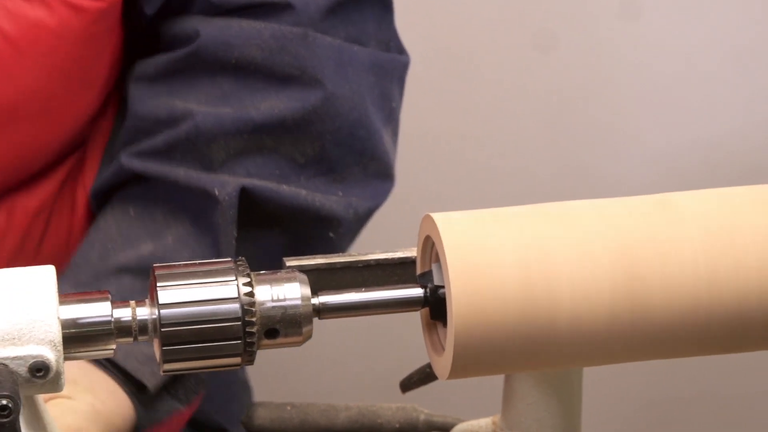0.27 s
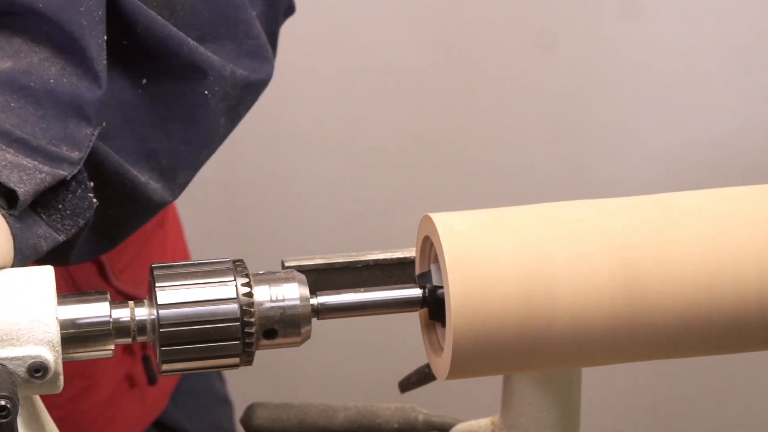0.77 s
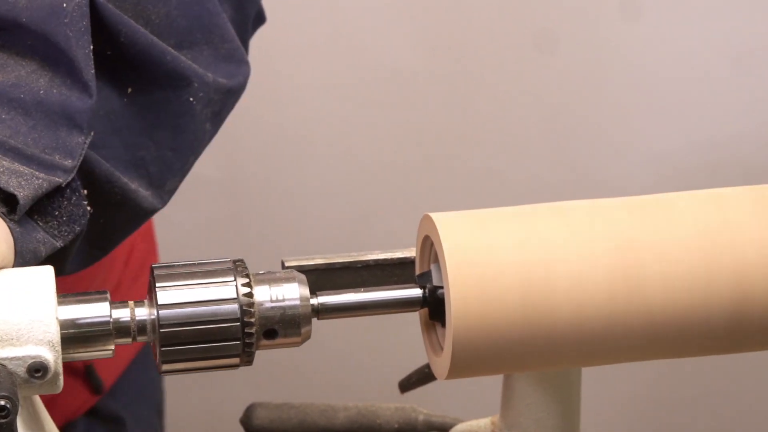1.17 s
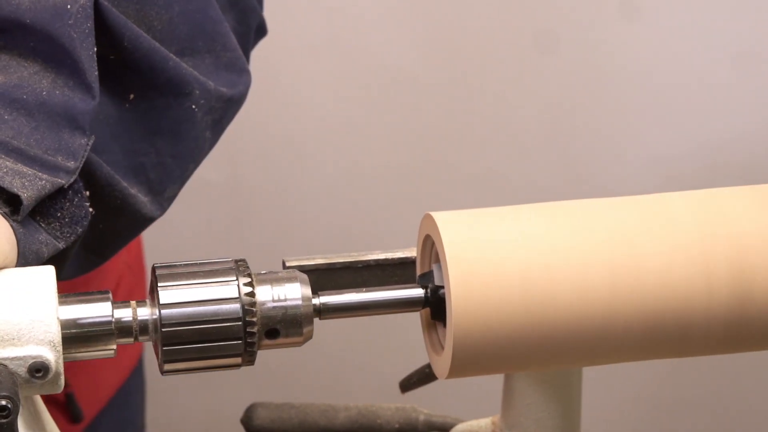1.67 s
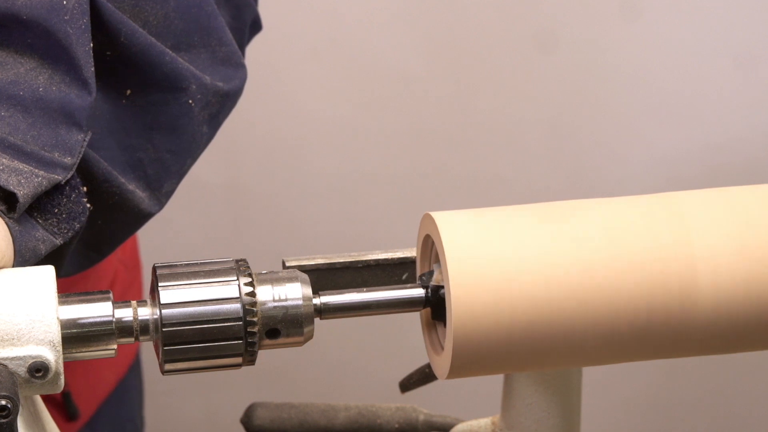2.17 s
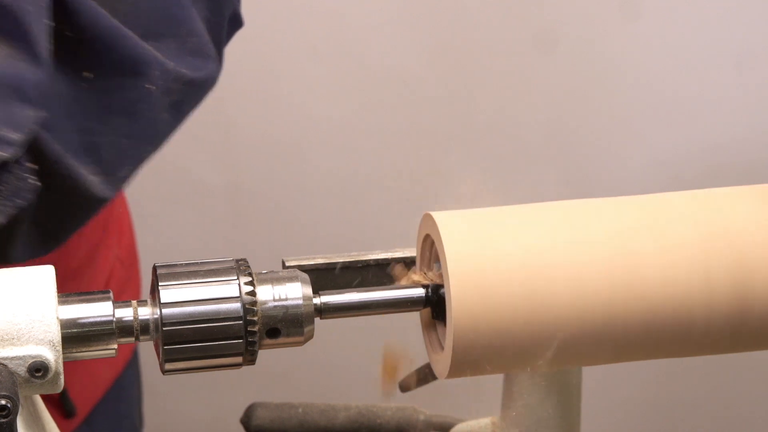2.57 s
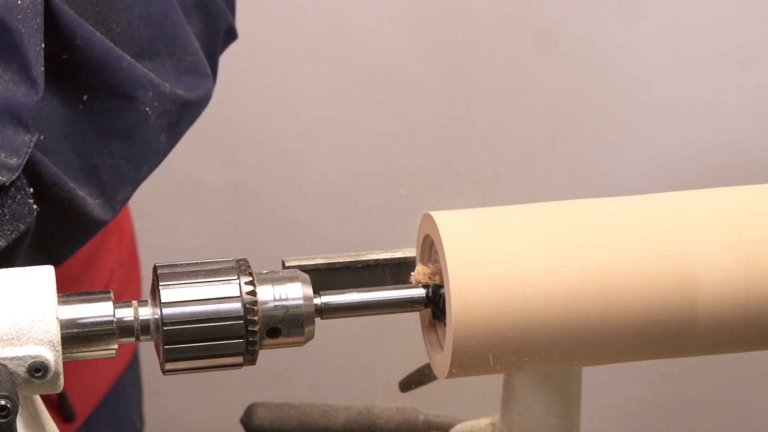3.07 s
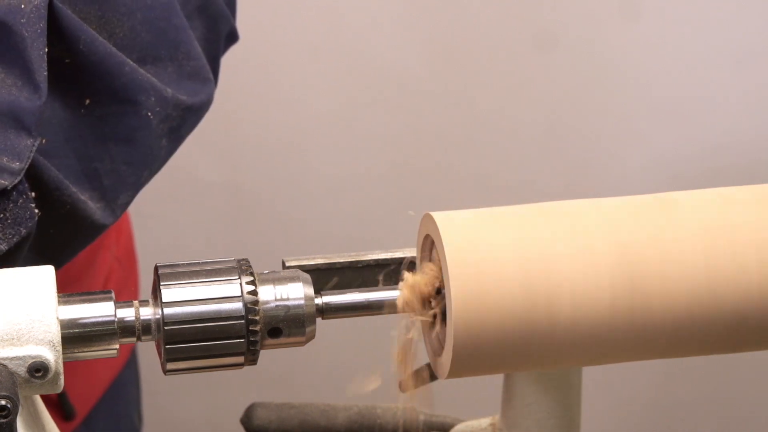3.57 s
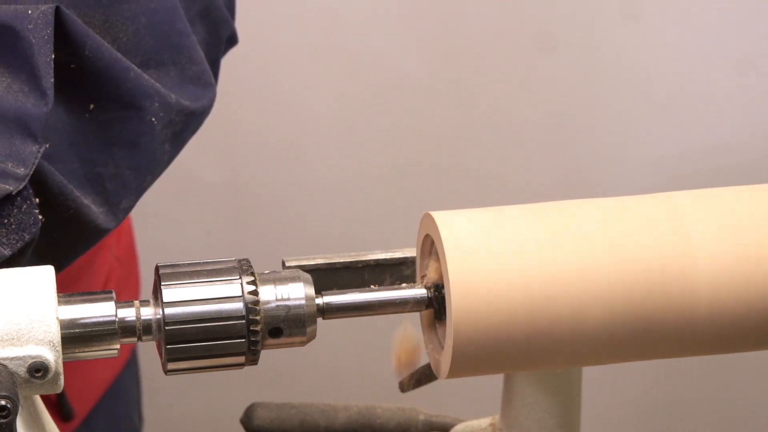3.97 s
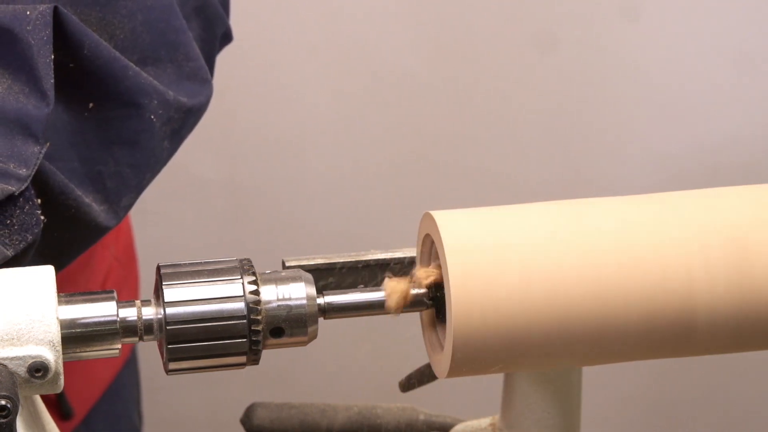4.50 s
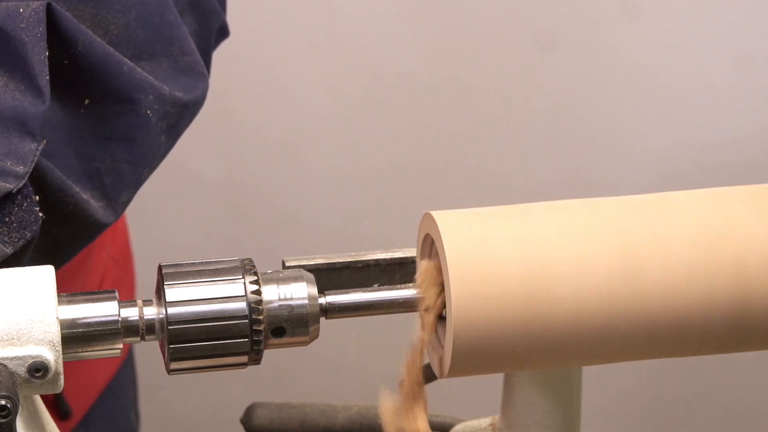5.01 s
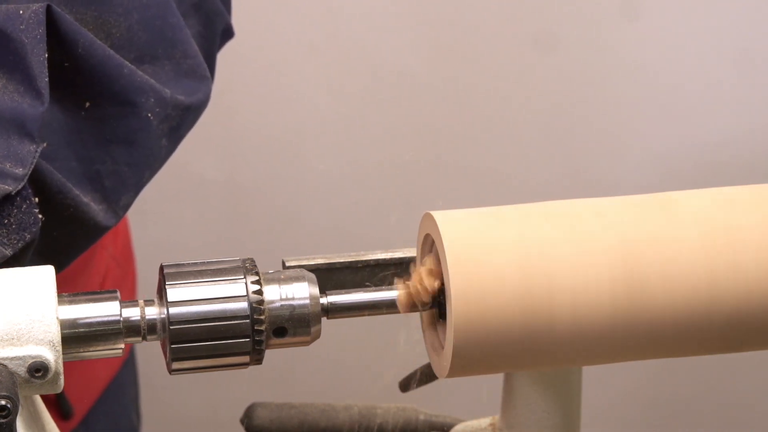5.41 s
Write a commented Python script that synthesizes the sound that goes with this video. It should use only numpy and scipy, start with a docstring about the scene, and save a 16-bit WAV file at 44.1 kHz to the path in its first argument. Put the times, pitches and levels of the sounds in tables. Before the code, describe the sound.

In a small workshop, a wood lathe idles with quiet hiss and hum. A nylon sleeve swishes close by and a hand knocks the tailstock. Ragged scuffs follow, then a steel bit bites into the spinning hollow blank: a noisy high whine and wooden growl, throbbing with each turn. Shavings pack the bore and muffle the steel before bursting free. Close microphone, short room echo.

```python
"""A wood lathe idles in a workshop; a nylon sleeve brushes past and a hand lands on the tailstock.
A boring bit then scuffs the spinning blank, and bites: its steel shank whines while the hollow blank growls.
The edge meets nearly the same grain on every turn, so the cut throbs and chatters in step with the spindle.
Shavings pack the bore, muffling the steel and swelling the growl. A low throb joins in, and air puffs past.
At last the shavings burst free. Most sounds are noise or clicks sent through the ringing of wood and metal."""
import sys
import numpy as np
from scipy import signal
from scipy.fft import rfft, irfft
from scipy.io import wavfile
from scipy.ndimage import map_coordinates

SR = 44100
rng = np.random.default_rng(int(sys.argv[2]) if len(sys.argv) > 2 else 0)


def master_out(mix):
    """Clip the mix to full scale and print it as 16-bit PCM to the path in sys.argv[1]."""
    frames = np.transpose(np.atleast_2d(mix))
    ceiling = np.clip(frames, -1, 1)
    pcm = np.round(ceiling * 32767).astype(np.int16)
    wavfile.write(sys.argv[1], SR, pcm)


N = 249165
TIME = np.arange(N) / SR
BINS = np.fft.rfftfreq(8192, 1 / SR)  # Hz
# the bit bites, and the shock of entry settles (s)
BITE_S, SETTLE_S = 2.226, 0.33
# shavings pack the bore, then burst free: moments, and the time each change takes (s)
PACK_S, PACKING_S, CLEAR_S, CLEARING_S = 3.85, 0.16, 5.49, 0.077


def amp(db):
    """Turns decibels into gain."""
    return 10 ** (np.asarray(db) / 20)


def unit(x):
    """Scales to an average (rms) level of 1."""
    return x / np.sqrt(np.mean(x ** 2) + 1e-20)


def slope(points):
    """Gain of a broad sound colour at each frequency."""
    hz, db = np.transpose(points)
    return amp(np.interp(np.log(BINS + 1), np.log(hz), db))


def peaks(modes, steep):
    """Gain of a set of resonances at each frequency; a larger steep darkens the valleys between them."""
    f = BINS + 1
    power = 0
    for hz, width, db in modes:
        detuning = (f * f - hz * hz) / (f * width)
        power = power + amp(db) ** 2 / (1 + detuning ** 2) ** steep
    return np.sqrt(power)


def ring(x, gain):
    """Sends x through a body that rings with this gain, never before it is struck; keeps white noise's level."""
    log_gain = np.log(np.maximum(gain / gain.max(), 1e-5))
    circle = np.concatenate([log_gain, log_gain[-2:0:-1]])
    # the Hilbert transform finds the timing (minimum phase) that belongs to this gain
    taps = np.fft.ifft(np.exp(signal.hilbert(circle).conj())).real[:len(gain)]
    return signal.oaconvolve(x, taps / np.linalg.norm(taps))[:N]


def noise():
    """White noise of rms 1."""
    return rng.standard_normal(N)


def drift(rate, size=8192):
    """Slow random wandering of rms 1, changing about rate times a second."""
    hz = np.fft.rfftfreq(size, N / SR / size)
    slow = irfft(rfft(rng.standard_normal(size)) * np.exp(-(hz / rate) ** 2))
    return unit(np.interp(TIME, np.linspace(0, N / SR, size), slow))


def snaps(per_s, spread_db):
    """Fibres snapping: sparse clicks, mostly small."""
    size = amp(spread_db * np.minimum(rng.exponential(1, N), 4))
    return unit(size * rng.choice([-1, 1], N) * (rng.random(N) < per_s / SR))


def held(start, end, rise, fall):
    """A level that rises from start, holds, and falls from end."""
    return np.clip((TIME - start) / rise, 0, 1) * np.clip(1 - (TIME - end) / fall, 0, 1)


def phase(turns, s):
    """Spindle angle in radians, counted from the moment s."""
    return 2 * np.pi * (turns - np.interp(s, TIME, turns))


def workshop(x, t60, wet_db):
    """Adds the short diffuse echo of a small room, fading by 60 dB in t60 seconds."""
    t = TIME[:SR // 2]
    tail = rng.standard_normal(len(t)) * amp(-60 * t / t60) * (t > .005)
    return x + amp(wet_db) * signal.oaconvolve(x, tail / np.linalg.norm(tail))[:N]


# how fast the spindle turns, sagging under load: (time [s], speed [turns per s])
SPINDLE_SPEED = [(1.6, 16.85), (1.9, 15.7), (2.15, 15.4), (2.3, 14.62), (2.75, 14.66), (3.0, 14.85),
                 (3.4, 14.94), (4.1, 15.55), (4.6, 15.12), (5.2, 15.0), (5.65, 15.1)]


def spindle():
    """Speed of the spindle, and the turns it has made so far, which everything follows."""
    speed = np.interp(TIME, *np.transpose(SPINDLE_SPEED))
    return speed, np.cumsum(speed) / SR


# broad colour of the bearing hiss: (frequency [Hz], relative level [dB per Hz])
BEARING_COLOUR = [(60, -24), (100, -21), (190, -20.5), (300, -17.5), (800, -13.5), (1150, -19.5),
                  (1400, -19.5), (2100, -15.5), (2700, -23), (3700, -25), (5000, -13.5), (7000, -20.5),
                  (10000, -20.5), (12500, -25.5), (15500, -27)]
# ringing of the headstock: (frequency [Hz], width [Hz], relative level [dB])
HEADSTOCK_MODES = [(323, 10, 4.5), (830, 31, 4.5), (1330, 250, -3), (2040, 170, -3), (4800, 85, -8)]
# steady motor tones: (frequency [Hz], level [dB])
MOTOR_TONES = [(726.7, -63), (807.5, -66), (1384, -65), (2019, -64), (4802, -66), (5679, -71), (7014, -64),
               (8737, -66)]
# drive hum: level (dB), the speed below which load weakens it (turns per s), and by how much (dB per turn per s)
HUM_DB, LABOUR_SPEED, HUM_DROP_DB = -56, 15.22, 23


def machine(turns, speed):
    """Bearing hiss pulsing with the spindle, wavering motor tones, rumble, and a hum that fades under load."""
    angle = phase(turns, s=1.246)
    pulse = amp(0.31 * np.cos(angle) + 0.81 * np.cos(2 * angle))
    headstock = amp(-10.0) * peaks(HEADSTOCK_MODES, steep=2.1)
    bearings = amp(-49.5) * ring(noise() * pulse, np.hypot(slope(BEARING_COLOUR), headstock))
    tones = np.zeros(N)
    for hz, db in MOTOR_TONES:
        tones += amp(db + 2.4 * drift(8.3)) * np.sin(2 * np.pi * hz * TIME + 1.06 * drift(6.7))
    hum_db = HUM_DB - HUM_DROP_DB * np.maximum(LABOUR_SPEED - speed, 0) + 1.1 * drift(5.4)
    # sqrt(2) makes the hum level an rms level; the hum makes 2.92 cycles a turn
    hum = amp(hum_db) * np.sqrt(2) * np.sin(2 * np.pi * 2.92 * turns + 0.14 * drift(6))
    rumble = amp(-64.5) * ring(noise(), peaks([(40, 73, 9), (99, 32, 3)], steep=1.06))
    return bearings + tones + hum + rumble


# a thin whistle grows until the bit bites: final level (dB), growth (dB per s)
WHISTLE_DB, WHISTLE_GROWTH_DB_PER_S = -45.5, 16


def whistle(turns, hz=5108):
    """A thin whistle of the idling lathe, and a light rub once a turn that goes on throughout."""
    angle = phase(turns, s=1.246)
    flutter = amp(1.7 * np.cos(angle) + 1.7 * drift(25))
    swell = (TIME < BITE_S) * amp(WHISTLE_DB + WHISTLE_GROWTH_DB_PER_S * (TIME - BITE_S))
    tone = swell * flutter * np.sin(2 * np.pi * hz * TIME + .3 * drift(14))
    rub_modes = [(8950, 280, -9), (9600, 400, 3), (10600, 300, -6), (13300, 200, -7)]
    rub = ring(noise() * unit(amp(8.5 * np.cos(angle))), peaks(rub_modes, steep=1.3))
    return tone + amp(-62) * rub


# strokes of the sleeve: (peak time [s], swish [dB], light nylon rustle [dB], rise [s], fall [s])
SLEEVE_STROKES = [(.49, -61, -48, 0.091, 0.056), (.682, -32.5, -38.5, 0.019, 0.039),
                  (.95, -70, -50.5, .03, .014)]
# broad colour of the swish: (frequency [Hz], relative level [dB per Hz])
SWISH_COLOUR = [(71, -48), (120, -15), (180, -23), (255, -4.5), (360, -11), (450, -0.5), (636, -2),
                (863, -7), (1560, -4.5), (2160, -14.5), (6730, -13.5), (15500, -20.5)]
# knock of the hand on the tailstock: (time [s], level [dB])
HAND_KNOCKS = [(.616, -39)]
# ringing of the tailstock: (frequency [Hz], width [Hz], relative level [dB])
TAILSTOCK_MODES = [(620, 74, 2), (800, 54, 1), (1110, 120, 0), (1510, 160, -5)]


def turner():
    """A nylon sleeve sweeps past as swelling noise, and a hand makes the tailstock ring."""
    swish, rustle = np.zeros((2, N))
    for s, swish_db, rustle_db, rise, fall in SLEEVE_STROKES:
        stroke = np.exp(-(np.minimum(TIME - s, 0) / rise) ** 2 - np.maximum(TIME - s, 0) / fall)
        swish += amp(swish_db) * stroke
        rustle += amp(rustle_db) * stroke
    nylon_colour = [(1000, -9), (3500, -9), (6000, -1.0), (10000, -3), (16000, -13)]
    cloth = ring(swish * noise(), slope(SWISH_COLOUR)) + ring(rustle * noise(), slope(nylon_colour))
    blow = sum(amp(db) * (TIME > s) * np.exp(-abs(TIME - s) / 0.012) for s, db in HAND_KNOCKS)
    knock = ring(blow * noise(), peaks(TAILSTOCK_MODES, steep=1.0))
    return workshop(cloth + knock, t60=0.61, wet_db=-7)


# first scuffs of the edge: (time [s], pressure [dB], hiss of flying dust [dB], length [s])
EDGE_SCUFFS = [(1.636, -36, -56.5, .01), (1.701, -36, -57, .032), (1.765, -35, -58.5, 0.004),
               (1.802, -40.5, -62, 0.011), (1.828, -29.5, -47, 0.035), (1.885, -29, -47.5, 0.0058),
               (1.903, -25.5, -37, 0.03), (1.954, -26.5, -45, 0.044), (2.019, -27.5, -41.5, 0.03),
               (2.087, -28, -45, 0.041), (2.16, -30, -52, 0.03), (2.21, -27.5, -52, 0.016)]


def scuffs():
    """Contact pressure and flying dust while the edge only grazes the high side of the blank."""
    press, dust = np.zeros((2, N))
    t = TIME[:SR // 4]
    for s, db, dust_db, length in EDGE_SCUFFS:
        touch = np.minimum(t / 0.0012, 1) * np.exp(-np.maximum(t - length, 0) / .012)
        press[round(s * SR):][:len(t)] += amp(db) * touch
        dust[round(s * SR):][:len(t)] += amp(dust_db) * touch
    return press, dust


# ringing of the lathe bed, shaken by each scuff: (frequency [Hz], width [Hz], relative level [dB])
BED_MODES = [(135, 25, -2.5), (204, 67, -11), (286, 31, 2.5), (430, 55, -3.5)]


def bed():
    """The one-sided scuffs shake the lathe bed."""
    return amp(-12) * ring(noise() * scuffs()[0], peaks(BED_MODES, steep=1.94))


def surface(turns, memory, size):
    """Wood met by the edge, size cells a turn; each turn keeps a share (memory) of the one before."""
    keep = np.clip(memory, 0, .99)
    wood = rng.standard_normal((128, size))
    for k in range(1, len(wood)):
        wood[k] = keep * wood[k - 1] + np.sqrt(1 - keep ** 2) * wood[k]
    return unit(map_coordinates(wood.ravel(), [turns * size], order=3, mode="nearest"))


def hardness(turns, grain_db, knots_db):
    """Cutting force: it drops most twice a turn, where the edges run along the grain, and varies with hard spots."""
    angle = phase(turns + 0.034 * drift(1.6), s=3.206)
    grain = 0.41 * np.cos(angle) + np.cos(2 * angle) + np.cos(4 * angle)
    hard_spots = surface(turns, memory=0.99, size=24)
    return unit(amp(-grain_db * unit(grain) + knots_db * hard_spots))


def bounce(turns, depth_db):
    """A part of the bit catches at nearly the same spots on each turn."""
    return unit(amp(depth_db * surface(turns, memory=0.92, size=22)))


def packing():
    """How tightly shavings fill the bore, 0-1."""
    return held(PACK_S, CLEAR_S, PACKING_S, CLEARING_S)


def loudness(part, attack_s, easing_per_s=0):
    """Gain of one part through scuffs, bite, free cut and packed bore; the effect of packing may ease off."""
    free_db, bite_db, packed_db, scuff_db = part
    entry = np.exp(-((TIME - BITE_S) / SETTLE_S) ** 2)
    packed = packing() * np.exp(-easing_per_s * np.maximum(TIME - PACK_S, 0))
    engaged = np.clip((TIME - BITE_S) / attack_s, 0, 1)
    return engaged * amp(free_db + bite_db * entry + packed_db * packed) + amp(scuff_db) * scuffs()[0]


# ringing of the steel bit and chuck: (frequency [Hz], width [Hz], relative level [dB])
STEEL_MODES = [(3620, 40, -14.5), (4080, 104, -15.5), (5240, 74, -8.5), (5470, 320, -13), (6077, 51, -2.5),
               (6005, 290, -8), (6800, 170, -9), (7200, 105, -7), (9245, 91, -7), (9593, 323, -9),
               (12760, 140, -14)]
# broad colour of the tearing fibres: (frequency [Hz], relative level [dB per Hz])
FIBRE_COLOUR = [(60, -93), (130, -25), (240, -31.5), (700, -18.5), (2500, -31), (4200, -28), (7200, -20),
                (8300, -35.5), (12000, -34), (16000, -35.5)]
# (free cut [dB], change at the bite [dB], change while packed [dB], level relative to a scuff's pressure [dB])
STEEL_LOUDNESS = (-27.5, -1, -4.5, -4)


def steel(force):
    """Tearing and snapping fibres ring the steel."""
    tearing = unit(noise() + 0.91 * snaps(per_s=2600, spread_db=2)) * force
    gain = np.hypot(peaks(STEEL_MODES, steep=1.24), amp(3.5) * slope(FIBRE_COLOUR))
    return ring(tearing * loudness(STEEL_LOUDNESS, attack_s=0.0066, easing_per_s=0.65), gain)


# bending of the shank: (frequency [Hz], width [Hz], relative level [dB])
SHANK_MODES = [(2945, 173, -3), (3032, 88, -3), (3230, 95, -12.5)]
# (free cut [dB], change at the bite [dB], change while packed [dB], level relative to a scuff's pressure [dB])
WHINE_LOUDNESS = (-30, -4.5, -2.5, -6)


def shank(turns, force):
    """The cut bends the shank, which whines."""
    whine = loudness(WHINE_LOUDNESS, attack_s=.005, easing_per_s=0.12)
    return ring(noise() * force * bounce(turns, depth_db=1.5) * whine, peaks(SHANK_MODES, steep=1.41))


# squeal of the bit's rim: (frequency [Hz], width [Hz], relative level [dB])
RIM_MODES = [(4705, 126, -2.5), (4593, 153, 8)]
# (free cut [dB], change at the bite [dB], change while packed [dB], level relative to a scuff's pressure [dB])
SQUEAL_LOUDNESS = (-35, -4.5, -7, -31)


def rim(force):
    """The rim of the bit squeals with the cutting force."""
    squeal = loudness(SQUEAL_LOUDNESS, attack_s=.005, easing_per_s=.2)
    return ring(noise() * force * squeal, peaks(RIM_MODES, steep=2.2))


def squeak(turns, hz=5222, width_hz=50):
    """The rim rubs the wall once a turn and squeaks."""
    rub = unit(amp(12.0 * np.cos(phase(turns, s=3.3))))
    squeal = loudness(SQUEAL_LOUDNESS, attack_s=.005)
    return amp(-17) * ring(noise() * rub * squeal, peaks([(hz, width_hz, 0)], steep=0.98))


# chips after the bite: first level (dB), growth (dB per s), change while packed (dB), burst on clearing (dB)
CHIPS_DB, CHIPS_GROWTH_DB_PER_S, CHIPS_PACKED_DB, CHIPS_BURST_DB = -44, 5.5, -10, 3


def chip_flow():
    """Chips fly faster as the cut opens, are held back in the packed bore, and leave in a burst."""
    growth_db = CHIPS_GROWTH_DB_PER_S * (np.clip(TIME, BITE_S, PACK_S) - BITE_S)
    burst = np.clip((TIME - CLEAR_S) / CLEARING_S, 0, 1)
    return (TIME > BITE_S) * amp(CHIPS_DB + growth_db + CHIPS_PACKED_DB * packing() + CHIPS_BURST_DB * burst)


# broad colour of the chips: (frequency [Hz], relative level [dB per Hz])
CHIP_COLOUR = [(2000, -56), (7500, -7), (10500, 0.5), (14000, 5), (16000, -8)]


def chips(force):
    """Dust from the scuffs, then chips leaving the bore, hiss and click."""
    hiss = unit(noise() + 0.82 * snaps(per_s=2000, spread_db=4.0))
    return ring(hiss * force * (chip_flow() + scuffs()[1]), slope(CHIP_COLOUR))


# ringing of the hollow blank, in three groups: (frequency [Hz], width [Hz], relative level [dB])
GROWL_MODES = [(718.4, 39, 1), (785, 76, -3), (817, 143, -3), (893, 43, -1)]
BOOM_MODES = [(313, 50, -3), (338, 43, -1), (421, 38, 1.5), (543, 41, -3), (585, 36, 0)]
RASP_MODES = [(1070, 58, -3), (1245, 93, -0.5), (1430, 104, -1.5), (1768, 80, -5), (1990, 120, -10.5),
              (2650, 1180, -10)]
# (free cut [dB], change at the bite [dB], change while packed [dB], level relative to a scuff's pressure [dB])
GROWL_LOUDNESS = (-40.5, 6.5, 3, -21)
BOOM_LOUDNESS = (-47, 5.5, 6.5, -21.5)
RASP_LOUDNESS = (-40, 3, 0, -26)


def blank(turns, force):
    """The wavy cut surface shakes the hollow blank, much alike from turn to turn."""
    growl = loudness(GROWL_LOUDNESS, attack_s=0.022)
    boom = loudness(BOOM_LOUDNESS, attack_s=0.022)
    rasp = loudness(RASP_LOUDNESS, attack_s=0.022)
    # the heavy blank evens out the force
    shake = surface(turns, memory=0.783, size=512) * unit(force ** 0.37)
    tear = (surface(turns, memory=0.58, size=1024) + 0.5 * snaps(per_s=250, spread_db=-2.0)) * force
    return (ring(shake * growl, peaks(GROWL_MODES, steep=1.72))
            + ring(shake * boom, peaks(BOOM_MODES, steep=1.01))
            + ring(tear * rasp, peaks(RASP_MODES, steep=0.86)))


# waves that the edge cuts into the bore and then rides on:
# (start [s], end [s], count at first [waves per turn], gain in count [waves per turn per s], level [dB])
BORE_WAVES = [(1.8, 4.0, 9, 0, -56), (2.4, 3.6, 20, 0, -44), (2.25, 2.8, 50, 0, -33.5),
              (2.6, 3.35, 49, 0, -37), (2.8, 3.38, 45, 0, -33.5), (3.38, 3.8, 44.7, 6, -31),
              (3.88, 4.33, 47, 0, -26.5), (3.5, 5.45, 54, 0, -32.5), (4.33, 5.5, 35, 0, -35.5),
              (4.5, 5.5, 55, 0, -32.5), (3.9, 5.1, 40, 0, -43), (5.5, 5.7, 40, 0, -35)]
# time that a wave pattern takes to grow or be cut away (s)
CHATTER_FADE_S = .09


def chatter(speed, force):
    """Each wave pattern on the bore grows, sings at its count times the spindle speed, and is cut away."""
    out = np.zeros(N)
    for start, end, waves, gained, db in BORE_WAVES:
        life = held(start, end, CHATTER_FADE_S, CHATTER_FADE_S)
        cycles = np.cumsum((waves + gained * (TIME - start)) * speed) / SR
        out += amp(db + 1.2 * drift(14)) * life * np.sin(2 * np.pi * cycles + .12 * drift(14))
    return out * unit(force ** 0.27)


# puffs of air from thrown shavings at the microphone: (time [s], peak level [dB], half length [s])
AIR_PUFFS = [(4.355, -34, 0.0066), (4.749, -27, 0.0057)]


def puffs(wake_db=-21, wake_s=0.19):
    """Passing air: one swing of pressure, down then up, and a short rumbling wake."""
    swing, wake = np.zeros((2, N))
    for s, db, half in AIR_PUFFS:
        swing += amp(db) * (TIME - s) / half * np.exp(.5 - .5 * ((TIME - s) / half) ** 2)
        wake += amp(db + wake_db) * (TIME > s) * np.exp(-abs(TIME - s) / wake_s)
    return swing + ring(wake * noise(), peaks([(55, 90, 0)], steep=1.3))


# the deep bore starts to rock (s), at this level (dB)
ROCK_S, ROCK_DB = 4.35, -38


def throb(turns, hz=326, sag=0.05):
    """A low throb that swells, and sags in pitch, once every two turns when the bit is deep in the bore."""
    rock = phase(turns, s=5.012) / 2
    pitch = hz * (1 - sag * np.sin(rock))
    shake = amp(1.8 * drift(30)) * np.sin(2 * np.pi * np.cumsum(pitch) / SR + 0.71 * drift(22))
    life = held(ROCK_S, CLEAR_S + CLEARING_S, rise=.07, fall=.08)
    return amp(ROCK_DB) * life * unit((1 + np.cos(rock)) * shake)


def scene():
    """Everything follows the turning of the spindle."""
    speed, turns = spindle()
    lathe = machine(turns, speed) + whistle(turns)
    skipping = amp(1.6 * drift(98) * (TIME < BITE_S))  # a grazing edge makes ragged contact
    force = hardness(turns, grain_db=1.5, knots_db=1.22) * skipping
    bit = steel(force) + shank(turns, force) + rim(force) + squeak(turns) + chips(force)
    cutting = workshop(bed() + bit + blank(turns, force), t60=0.52, wet_db=-11.0)
    return (lathe + turner() + cutting + chatter(speed, force) + puffs() + throb(turns))[None]


def record(dry, start_s=.303, notch_hz=7880, edge_hz=15740):
    """The sound opens abruptly after silence; a narrow notch in the treble, then nothing above the edge."""
    opened = dry * np.clip((TIME - start_s) / 0.0011, 0, 1)
    notched = signal.lfilter(*signal.iirnotch(notch_hz, 32, SR), opened)
    low_pass = signal.firwin(701, edge_hz, window=("kaiser", 9), fs=SR)
    return signal.oaconvolve(notched, low_pass[None], "same")


dry = scene()
out = record(dry)
master_out(out)
```